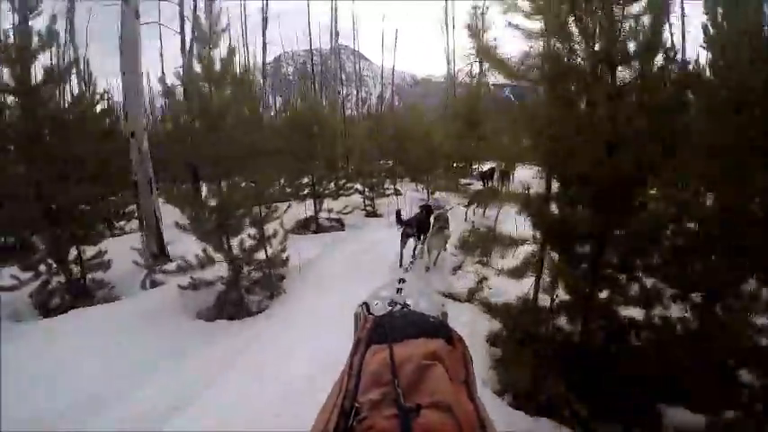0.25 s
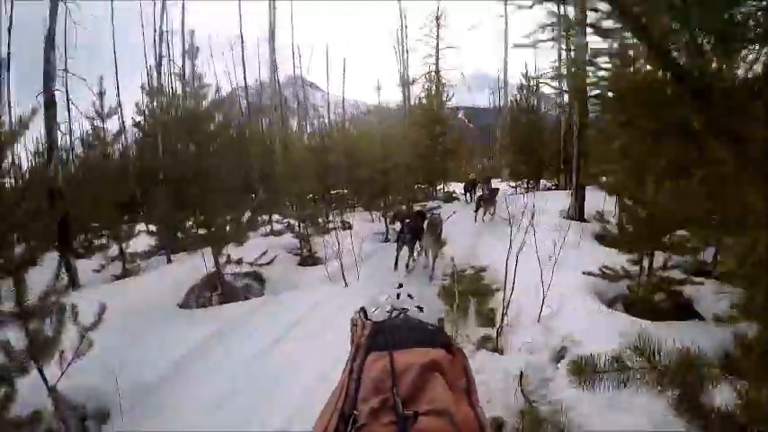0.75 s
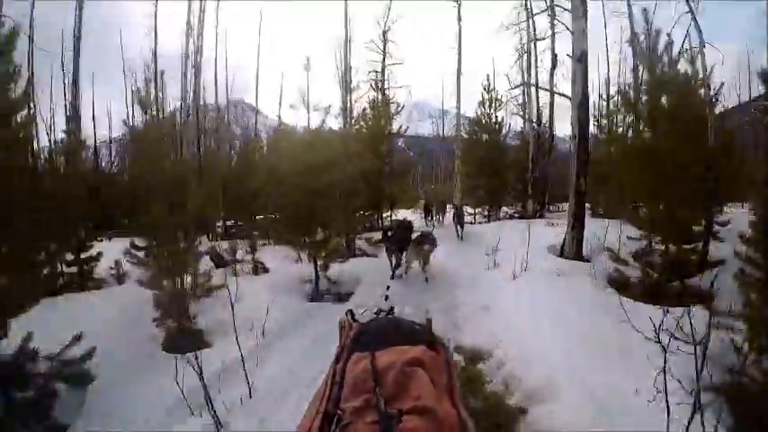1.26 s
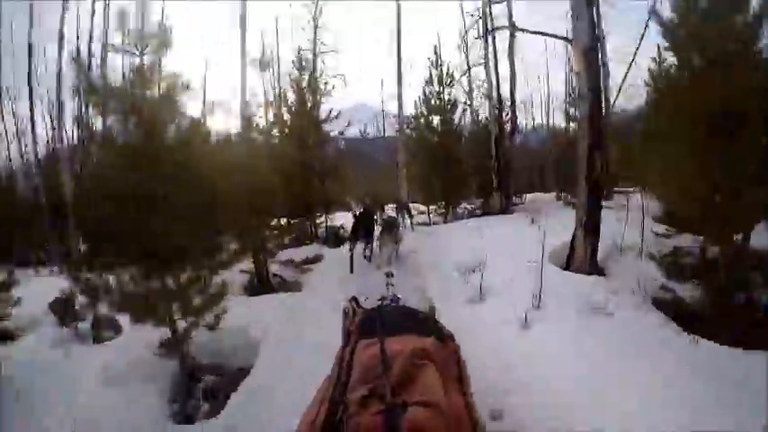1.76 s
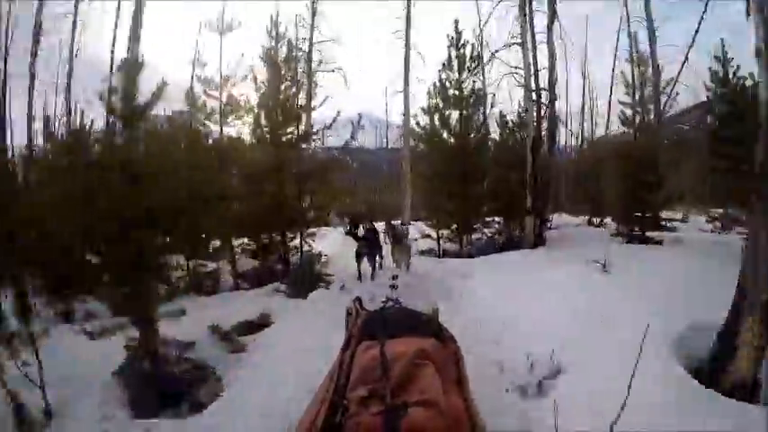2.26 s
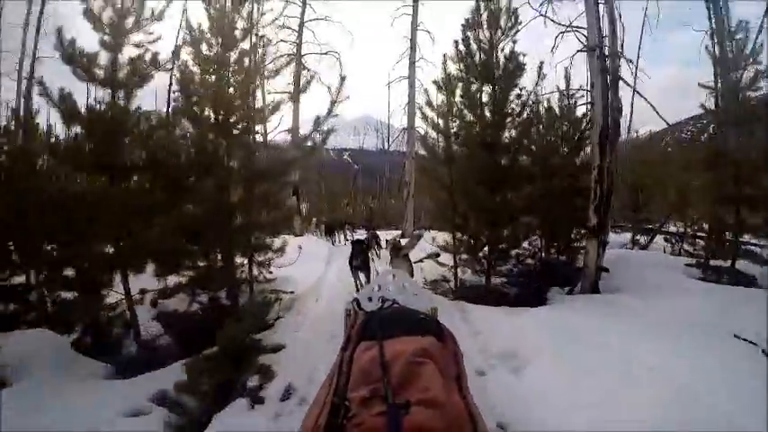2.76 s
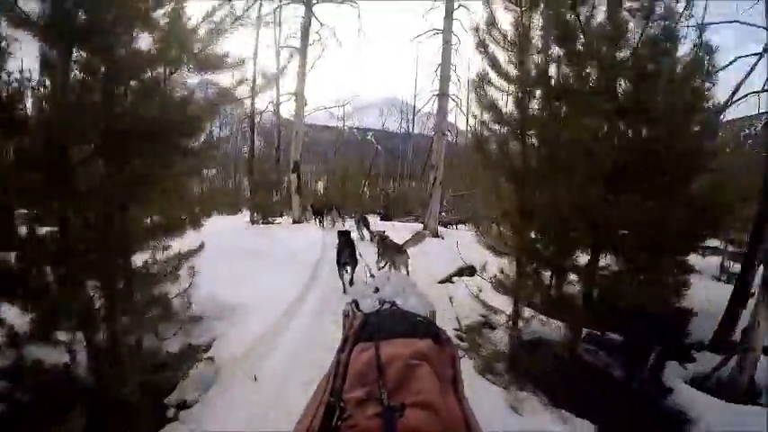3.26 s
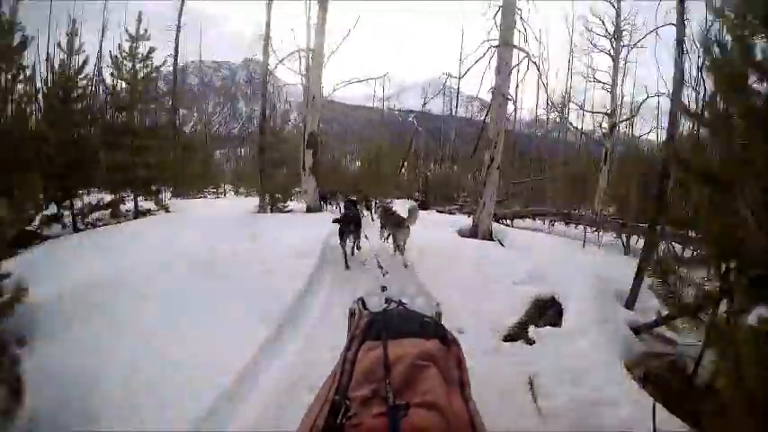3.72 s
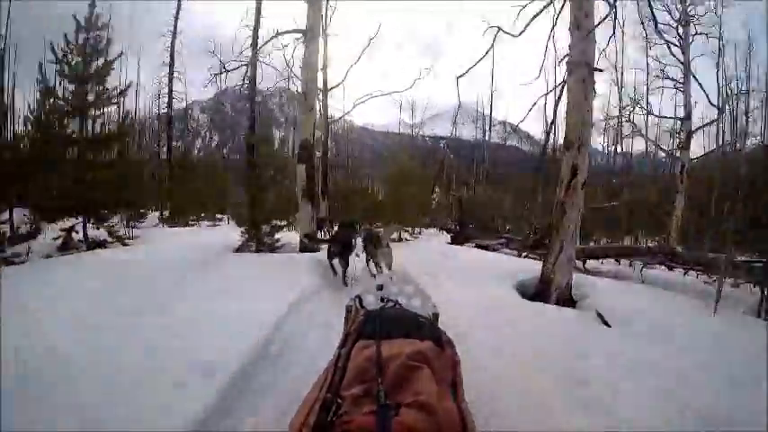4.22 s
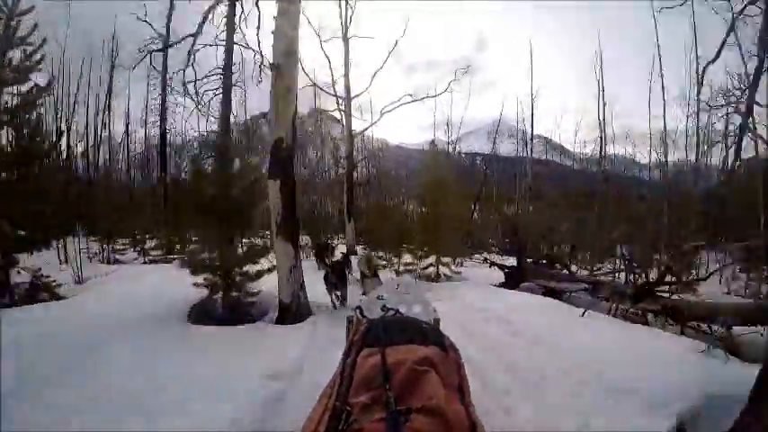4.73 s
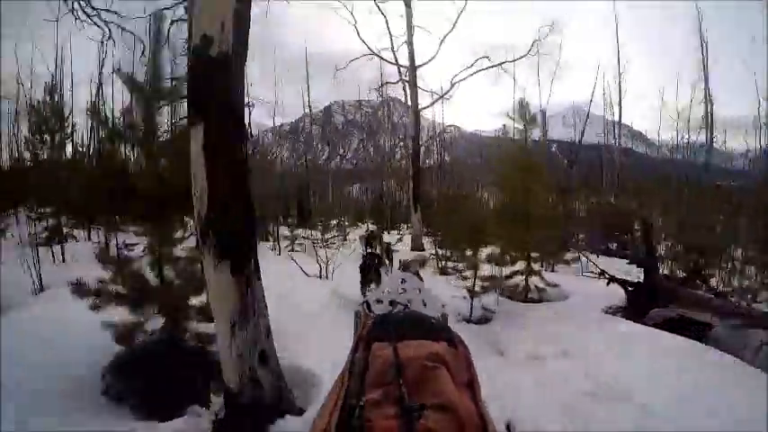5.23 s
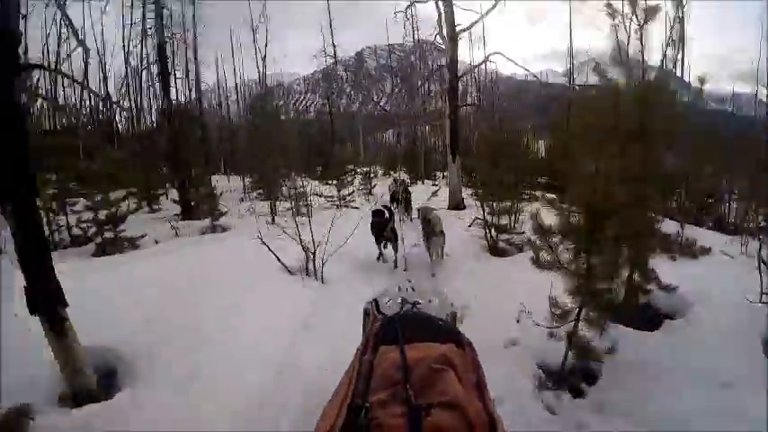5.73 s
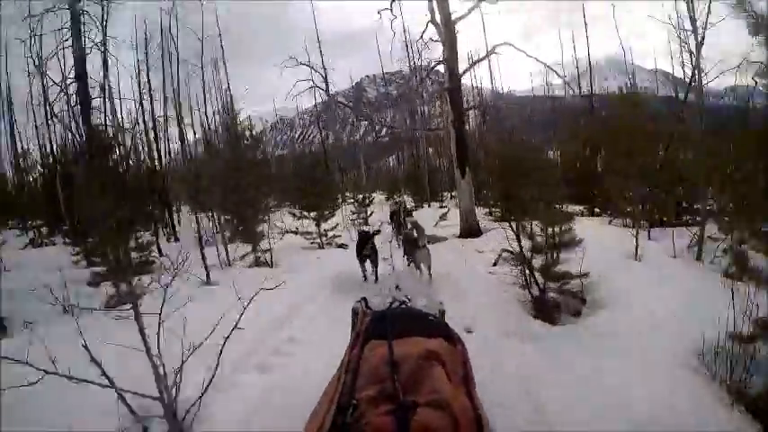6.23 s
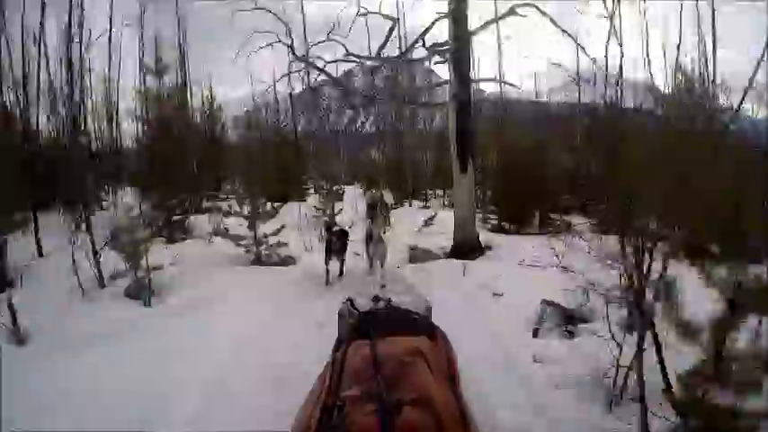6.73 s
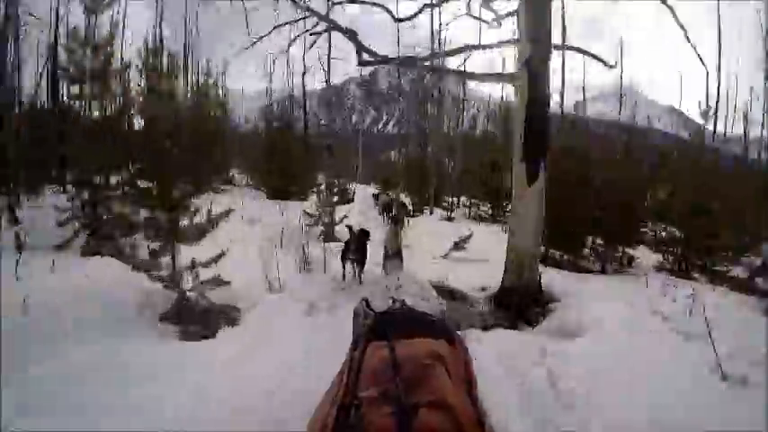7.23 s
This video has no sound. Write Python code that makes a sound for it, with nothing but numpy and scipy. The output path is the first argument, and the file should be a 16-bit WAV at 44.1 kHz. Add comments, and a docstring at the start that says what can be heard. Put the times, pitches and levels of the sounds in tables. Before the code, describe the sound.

Sled runners scrape steadily over crusty snow with a boxy, muffled hiss, while low thumps, knocks and brittle crunches mark bumps, hardest around five seconds.

```python
"""On crusty snow a dog sled glides along, heard by a microphone in a sealed case carried on the sled.
The runners crush snow grains: hiss and snaps pass through the case and swell and fade in six registers.
The frame, filtered noise and dying low tones, shudders and thumps over bumps, with a knock on wood.
Short noise bursts make crunches of crust, a double twig snap and dry clicks; powder hisses faintly.
The input flattens the largest swings, so the hardest bump overloads it."""
import sys
import numpy as np
from scipy import signal
from scipy.fft import rfft, irfft
from scipy.io import wavfile
from scipy.ndimage import uniform_filter1d

SR = 44100
rng = np.random.default_rng(int(sys.argv[2]) if len(sys.argv) > 2 else 0)


def transcribe(u):
    """Save the signal u as a 16-bit wav file named by the first command-line argument.

    u: samples, shape (n,) or (channels, n), limited to [-1, 1]; the rate is SR.
    q: integer samples, one column per channel.
    """
    v = np.clip(np.atleast_2d(u).T, -1, 1)
    q = np.round(v * 32767).astype(np.int16)
    wavfile.write(sys.argv[1], SR, q)


def voltage_ratio(level):
    """Linear amplitude factor for a level in decibels (scalar or array-like)."""
    return 10 ** (np.asarray(level, float) / 20)


N = 329868  # samples, about 7.48 s


def curve(table):
    """Draw straight lines between the rows of a table, giving each column a value for every sample."""
    time_s, *columns = np.transpose(table)
    return [np.interp(np.arange(N) / SR, time_s, column) for column in columns]


def unit(x):
    """Scale to an average strength (rms) of 1."""
    return x / np.sqrt(np.mean(x ** 2))


def band(x, low_hz, high_hz, order=2):
    """Keep mainly the sound between two frequencies."""
    return signal.sosfilt(signal.butter(order, [low_hz, high_hz], "bandpass", fs=SR, output="sos"), x)


def noise():
    """Plain hiss, equally strong at all frequencies."""
    return rng.standard_normal(N)


def walk(rate_hz):
    """A wandering level: random steps, smoothed twice, with a spread of 1."""
    hold = int(SR / rate_hz)
    steps = np.repeat(rng.standard_normal(N // hold + 1), hold)
    smooth = uniform_filter1d(uniform_filter1d(steps, hold), hold)
    return unit(smooth[:N])


def bursts(table, rise_s):
    """Noise that rises quickly and dies away, one burst for each row (time, level, t60)."""
    envelope = np.zeros(N)
    t = np.arange(SR // 4) / SR
    for time_s, level_db, t60_s in table:
        start = int(time_s * SR)
        decay = voltage_ratio(level_db - 60 * t / max(t60_s, 0.002))
        envelope[start:start + len(t)] += decay * (1 - np.exp(-t / rise_s))
    return envelope * noise()


# resonances of the case, whose powers add up:
# (frequency [Hz], width between the points about 4.6 dB under the peak [Hz], level [dB])
RESONANCES = [(241.7, 21.3, -4.5), (318, 72, -13), (487, 98, -9), (661, 201, -2.5), (1054, 302, -9),
              (1528, 190, -8.5), (1811, 140, -5.5), (1968, 308, -1.5), (2513, 336, -8), (2751, 134, -5),
              (2814, 19, -29), (3280, 29, -29), (3660, 640, -17), (4323, 240, -22.5), (4830, 150, -28.5),
              (5743, 460, -17.5), (6900, 600, -37)]
# narrow dips of the case: (frequency [Hz], width at half depth [Hz], depth [dB])
NOTCHES = [(880, 80, 5), (1850, 20, 6), (2870, 30, 6), (3050, 150, 3), (3300, 50, 5), (4130, 70, 9),
           (4590, 70, 7), (5130, 120, 5)]


def through_case(x, steepness=1.543, size=8192):
    """The case strengthens sound near its resonances and weakens it in its dips."""
    hz = np.arange(size // 2 + 1) * SR / size
    power = sum(voltage_ratio(level_db) ** 2 / (1 + (2 * (hz - center) / width) ** 2) ** steepness
                for center, width, level_db in RESONANCES)
    dips = sum(np.log(voltage_ratio(depth_db)) / (1 + (2 * (hz - center) / width) ** 2)
               for center, width, depth_db in NOTCHES)
    # folding the cepstrum makes the case answer only after a sound arrives, never before
    cepstrum = irfft(np.log(power) / 2 - dips)
    cepstrum[1:size // 2] *= 2
    cepstrum[size // 2 + 1:] = 0
    response = irfft(np.exp(rfft(cepstrum)))
    return signal.fftconvolve(x, response)[:N]


def grains(rate_hz, spread_db):
    """Snow crystals snap at random moments as single clicks, a few much larger than the rest."""
    chance = rng.random((3, N))
    snaps = chance[0] < rate_hz / SR
    direction = np.sign(chance[1] - 0.5)
    size_db = np.minimum(-spread_db * np.log(1 - chance[2]), 11)
    return unit(snaps * direction * voltage_ratio(size_db))


# scrape level under the pressure of the runners, with sudden steps up or down between the lists,
# before chatter and flicker: (time [s], level [dB])
PRESSURE = [
    [(0.0, -18.5), (0.048, -20), (0.294, -30.5), (0.43, -24.5)],
    [(0.46, -20), (0.612, -22.5), (0.88, -17), (0.912, -27), (0.976, -20.5), (1.06, -27.5), (1.626, -23.5),
     (1.73, -27)],
    [(1.77, -17), (2.12, -23.5), (2.45, -23), (2.73, -17), (3.01, -22.5), (3.18, -15.5), (3.56, -26.5),
     (3.83, -19), (4.57, -18), (4.58, -23.5), (4.69, -24), (4.76, -31), (4.77, -25), (4.9, -28),
     (5.04, -28.5)],
    [(5.09, -25.5), (5.19, -29), (5.22, -29.5), (5.42, -33.5), (5.65, -39.5), (5.797, -34.5)],
    [(5.81, -19.5), (5.948, -29), (6.004, -23), (6.148, -24.5), (6.204, -19.5), (6.554, -27.5),
     (6.632, -18.5), (7.48, -18.5)],
]
# colour of the scrape as the snow changes, before each register takes its share:
# (time [s], treble lift [dB], low lift [dB])
SNOW_COLOUR = [(0, -1, -3.5), (.5, 0.5, 2.5), (.9, 2.5, 2), (1.2, -3.5, -0.5), (1.7, -7, 4),
               (1.9, 0.5, 0.5), (2.3, 4.5, -2.5), (2.8, 1, 0.5), (3.1, -5.5, 2.5), (3.6, -2.5, 0.5),
               (3.9, 1.5, -1.5), (4.5, 2, -1), (5.0, -4, 3), (5.5, 2.5, -1), (5.9, 1, 0.5), (6.5, 1.5, 1),
               (6.9, 0, -1.5), (7.48, -1, -5.5)]
# hollow ring of the sled bed, before waver, chatter and flicker: (time [s], level [dB])
BED_RING = [(0, -37), (.19, -46.5), (.56, -21.5), (.68, -29), (.83, -24), (1.15, -38.5), (1.65, -34.5),
            (1.8, -25.5), (2.44, -44.5), (2.55, -30), (3.17, -29), (3.4, -34.5), (4.4, -33), (4.9, -39),
            (5.1, -34), (5.5, -47.5), (5.85, -39), (6.2, -27.5), (6.4, -38.5), (6.9, -28.5), (7.05, -38),
            (7.48, -36)]


def runners():
    """Runners crush snow into hiss and grains; chatter shakes all registers and each also flickers."""
    scrape_db, = curve(np.concatenate(PRESSURE))
    treble_db, low_db = curve(SNOW_COLOUR)
    bed_db, = curve(BED_RING)

    def follow(offset_db, pressure_share, lift_share, lift_db):
        """Level of a register that follows the pressure and the colour of the snow."""
        usual_db = -22
        return usual_db + offset_db + pressure_share * (scrape_db - usual_db) + lift_share * lift_db

    drag_db = follow(-5, 0.88, 0.95, low_db)
    grit_db = follow(-14.5, 1.1, 0.5, treble_db)
    whistle_db = follow(-21, 1.13, 0.96, treble_db)
    hiss_db = (grit_db + whistle_db) / 2 - 14.5
    chatter_db = 0.74 * walk(30)
    snow = through_case(noise() + 0.7 * grains(2000, 3.5))
    # (low edge [Hz], high edge [Hz], level [dB], own flicker [dB])
    registers = [(161, 273, bed_db + 3 * walk(5), 0.56), (295, 1230, drag_db, 0.59),
                 (1317, 2813, scrape_db, 0.49), (3116, 4990, grit_db, 0.89),
                 (5230, 6110, whistle_db, 0.91), (6220, 7520, hiss_db, 0.45)]
    out = np.zeros(N)
    for low_hz, high_hz, level_db, flicker_db in registers:
        register = unit(band(snow, low_hz, high_hz, order=4))
        out += register * voltage_ratio(level_db + chatter_db + flicker_db * walk(13))
    return out


# shaking of the frame, before its waver: (time [s], slow heave level [dB], faster shudder level [dB])
SHAKING = [(0.0, -34.5, -8), (0.08, -8.5, -28), (0.25, -28.5, -36), (0.52, -10.5, -27), (0.71, -19, -18),
           (0.94, -12, -27.5), (1.18, -41, -32), (1.35, -14.5, -34), (1.77, -17, -18), (1.91, -12.5, -22),
           (2.23, -23, -29), (2.56, -19, -29.5), (2.98, -17.5, -24), (3.4, -15, -27), (3.46, -25.5, -26.5),
           (3.77, -14.5, -25.5), (4.33, -15, -19.5), (4.73, -24.5, -23.5), (4.81, -14.5, -24),
           (5.42, -36.5, -41.5), (5.6, -21, -37), (5.94, -16, -22), (7.23, -17, -28), (7.48, -31, -28.5)]
# bumps under the frame, level before the soft onset:
# (time [s], level [dB], pitch [Hz], time to fall 60 dB [s], first swing up 1 or down -1)
FRAME_BUMPS = [(0.883, 3, 39.3, 0.13, -1), (1.747, -17.5, 49.6, 0.13, -1), (2.774, -9.5, 71, 0.34, 1),
               (3.992, -8, 58.4, 0.2, 1), (4.491, -8, 66.4, 0.41, 1), (4.7765, -3, 47.3, 0.27, -1),
               (5.0613, 11.5, 49.3, 0.11, -1), (5.825, -7, 40.7, 0.71, 1), (6.253, -8.5, 48, 0.22, -1)]


def frame():
    """The wooden frame heaves and shudders on uneven snow and rings low after each bump."""
    heave_db, shudder_db = curve(SHAKING)
    heave = unit(band(noise(), 20.7, 40.8)) * voltage_ratio(heave_db + 2.5 * walk(5))
    shudder = unit(band(noise(), 47.2, 87.3)) * voltage_ratio(shudder_db + 3 * walk(6))
    out = heave + shudder
    t = np.arange(SR // 2) / SR
    for time_s, level_db, hz, t60_s, direction in FRAME_BUMPS:
        # the blow itself adds a quick half swing or so before the frame settles on its pitch
        phase = 2 * np.pi * (hz * t + 0.6 * (1 - np.exp(-t / 0.0055)))
        onset = 1 - np.exp(-t / 0.0038)
        start = int(time_s * SR)
        out[start:start + len(t)] += direction * voltage_ratio(level_db - 60 * t / t60_s) * np.sin(phase) * onset
    return out


def wood_knocks():
    """Each bump also knocks on wood: a short burst of noise in the low middle."""
    knocks = [(time_s, 1.05 * level_db + 5.5, 0.05) for time_s, level_db, *_ in FRAME_BUMPS]
    return band(bursts(knocks, 0.00079), 150, 750)


# lumps of crust breaking under a runner, before the case and filter:
# (time [s], level [dB], time to fall 60 dB [s])
CRUST_BREAKS = [(1.011, -13, 0.021), (1.7517, -1.5, 0.04), (1.772, -7, 0.034), (3.079, -9, 0.035),
                (3.909, -4.5, 0.033), (3.9813, -1.5, 0.028), (4.1085, -6, 0.036), (4.142, -7, 0.03),
                (4.7724, -9, 0.02), (5.0589, 2, 0.021), (5.0676, 2, 0.025), (5.1437, -11.5, 0.035),
                (5.1616, -16, 0.03), (5.1827, -11, 0.034), (5.806, -19, 0.023), (5.834, -10, 0.018),
                (5.8684, -8.5, 0.05), (6.2472, -10, 0.034)]


def crunches():
    """Breaking lumps of crust are noise bursts that ring the middle resonances of the case."""
    crunch = band(through_case(bursts(CRUST_BREAKS, 0.0018)), 640, 3300)
    # the highest peak ends 1 dB under the highest level in the table
    top = voltage_ratio(-1) * np.max(voltage_ratio(np.array(CRUST_BREAKS)[:, 1]))
    return crunch * top / np.max(np.abs(crunch))


# dry ticks: a double twig snap near 0.94 s, and clicks where the input overloads on the largest swings;
# before the filters and their gains: (time [s], level [dB], time to fall 60 dB [s])
DRY_TICKS = [(0.821, -37, 0.0048), (0.9353, -16, 0.0068), (0.944, -23, 0.006), (1.7534, -40, 0.0071),
             (1.834, -56.5, 0.0073), (1.9908, -38, 0.0064), (2.8479, -50.5, 0.006), (3.1248, -44, 0.0067),
             (3.9804, -35, 0.0041), (4.2173, -41, 0.006), (4.3727, -42.5, 0.0054), (5.0609, -29.5, 0.006),
             (5.0691, -10.5, 0.0051)]


def ticks():
    """A twig snap and overload clicks: tiny noise bursts in two treble bands, without the case."""
    tick = bursts(DRY_TICKS, 0.00025)
    return band(tick, 2500, 7400) * voltage_ratio(11.5) + band(tick, 8000, 14000) * voltage_ratio(-4.5)


# powder thrown up by the runners, before each band's own level and waver: (time [s], level [dB])
POWDER_SPRAY = [(0.0, -66), (0.3, -73.5), (0.8, -65), (1.2, -75.5), (2.25, -72), (3.8, -64.5), (4.98, -69),
                (5.13, -74.5), (5.8, -78), (6.1, -71.5), (6.54, -71), (7.48, -63.5)]
# bands in which the powder hisses, level added to the spray: (low edge [Hz], high edge [Hz], level [dB])
POWDER_BANDS = [(7500, 8200, -0.5), (10200, 11500, -4), (12200, 14200, -3.5), (8000, 12000, -3)]


def powder():
    """Thrown powder is a faint fine hiss whose bands also come and go on their own."""
    spray_db, = curve(POWDER_SPRAY)
    out = np.zeros(N)
    for low_hz, high_hz, level_db in POWDER_BANDS:
        hiss = unit(band(noise(), low_hz, high_hz, order=3))
        out += hiss * voltage_ratio(spray_db + level_db + 1.6 * walk(3))
    return out


def scene():
    """All sounds add up at one microphone."""
    return (runners() + frame() + wood_knocks() + crunches() + ticks() + powder())[None]


def low_pass(x):
    """Removes everything above the highest recorded frequency."""
    return signal.sosfilt(signal.butter(12, 15250, fs=SR, output="sos"), x)


def record(dry):
    """The input stage flattens the largest swings, bending smoothly towards a ceiling."""
    ceiling = 0.96  # of full scale
    flat = dry / (1 + np.abs(dry / ceiling) ** 8) ** (1 / 8)
    return low_pass(flat)


dry = scene()
out = record(dry)
transcribe(out)
```